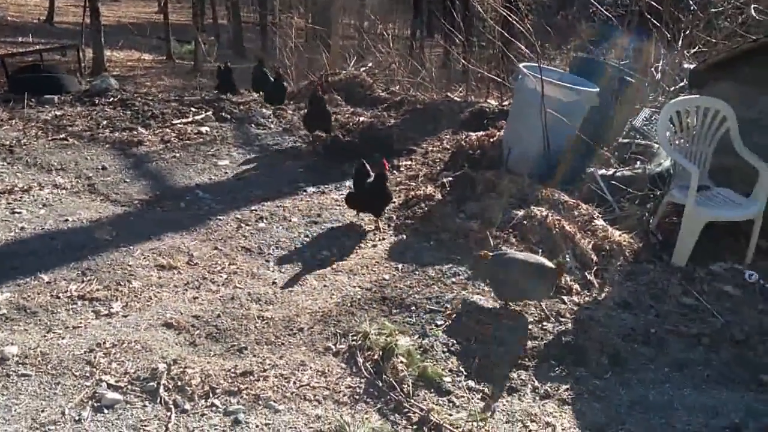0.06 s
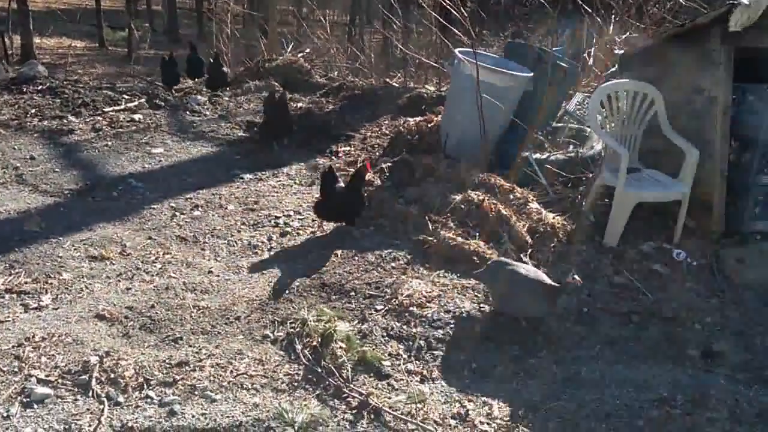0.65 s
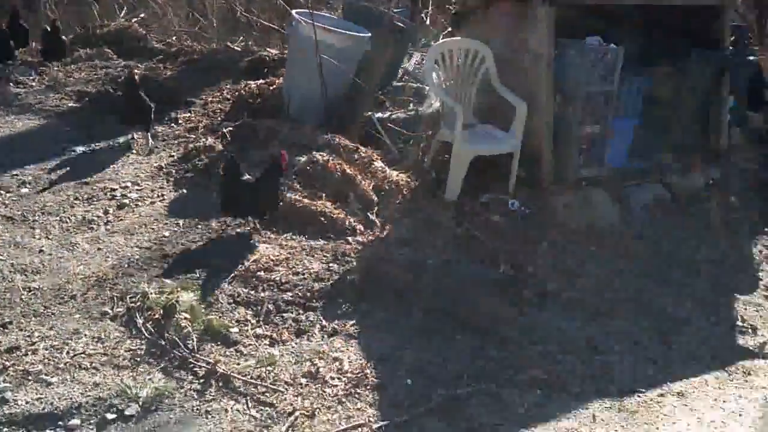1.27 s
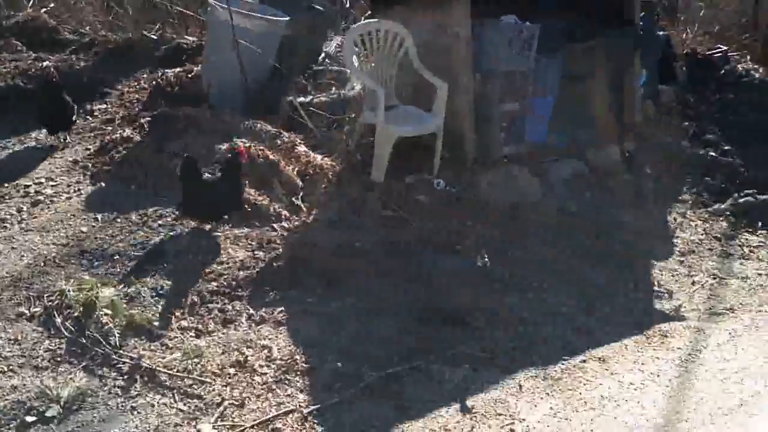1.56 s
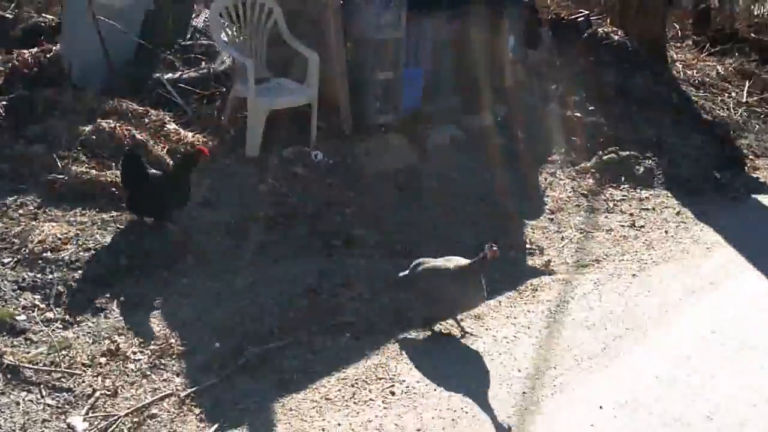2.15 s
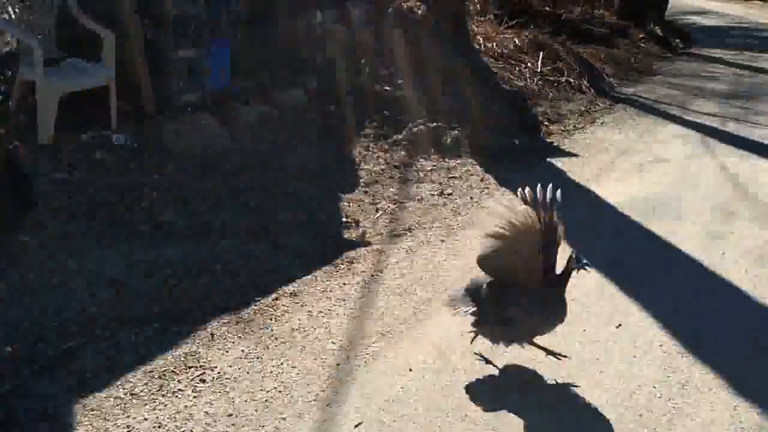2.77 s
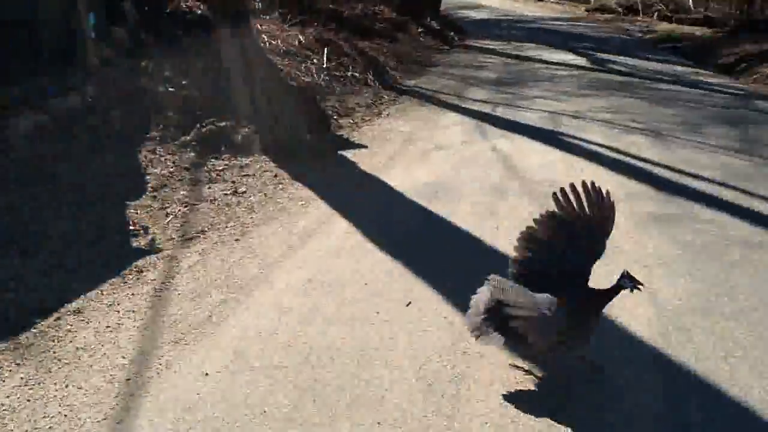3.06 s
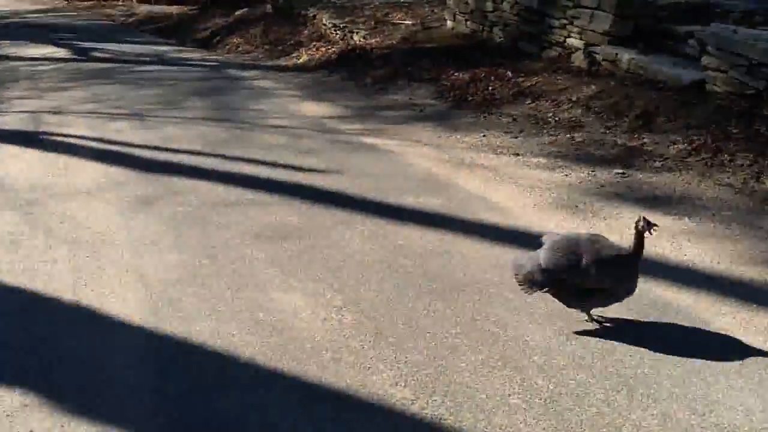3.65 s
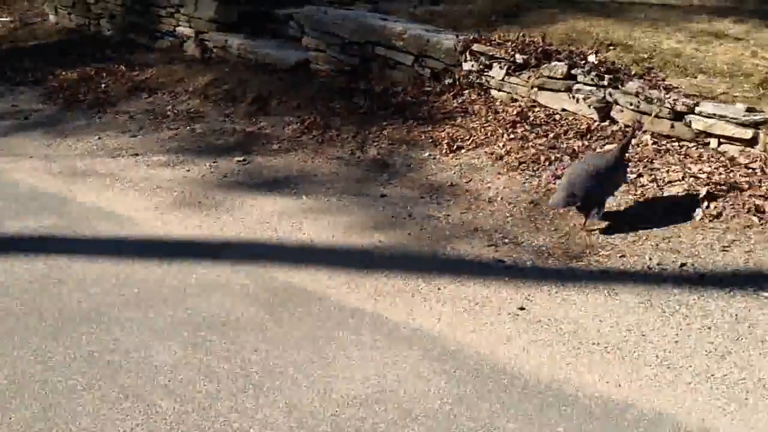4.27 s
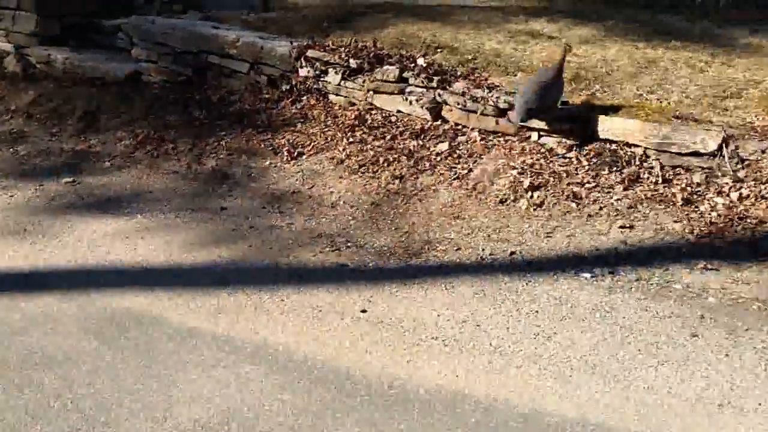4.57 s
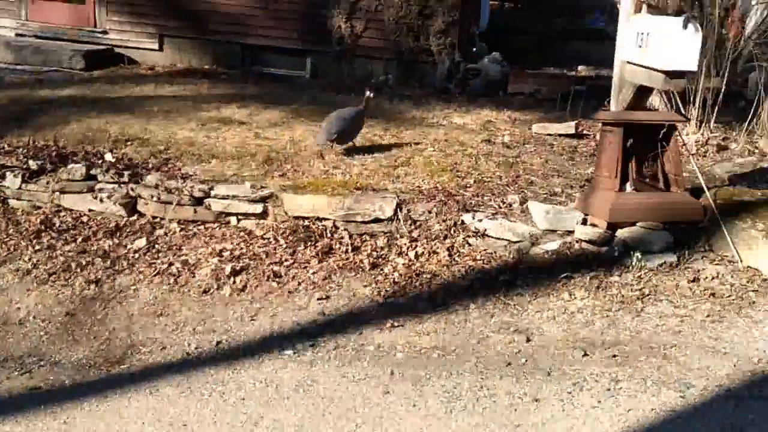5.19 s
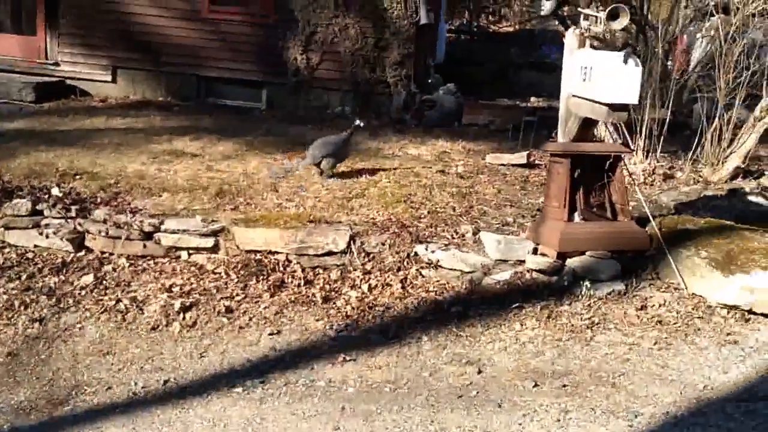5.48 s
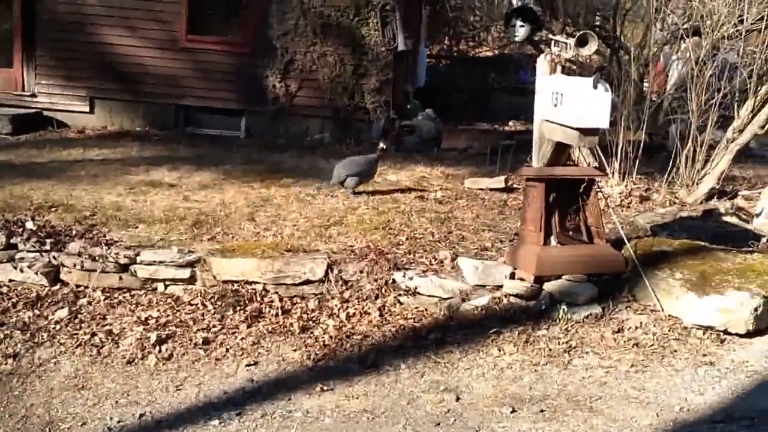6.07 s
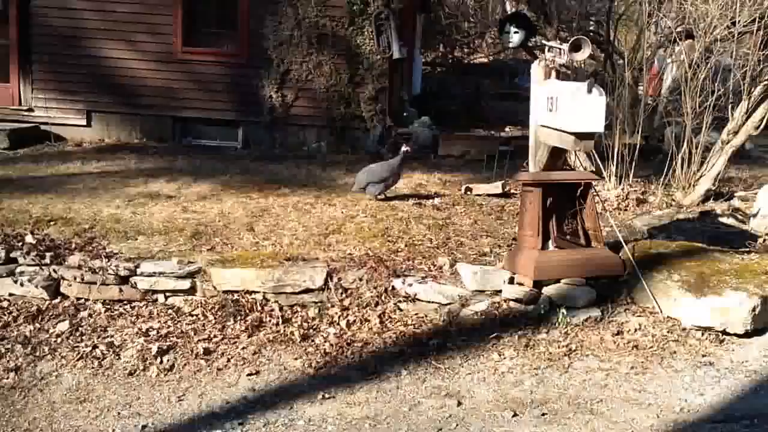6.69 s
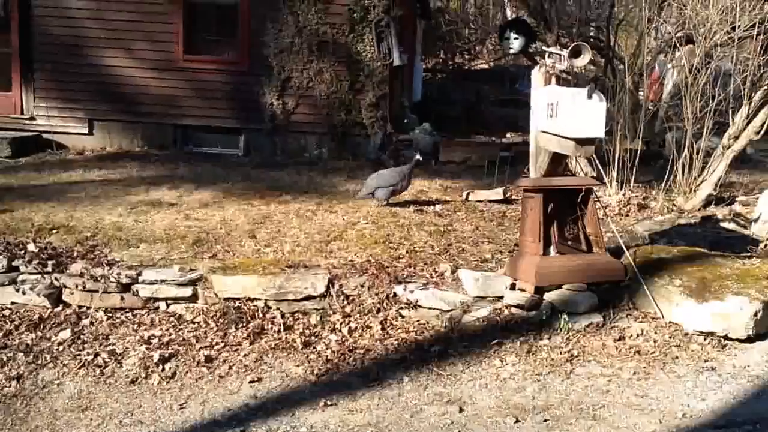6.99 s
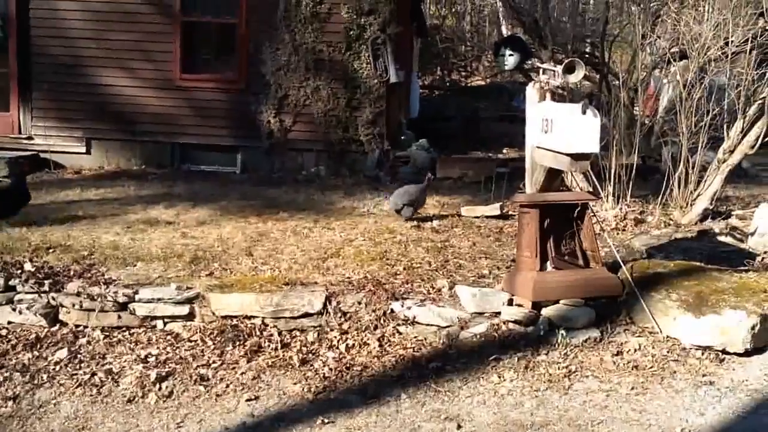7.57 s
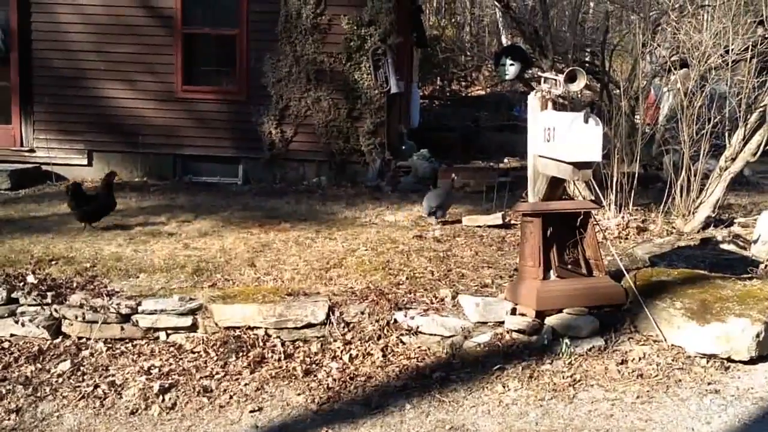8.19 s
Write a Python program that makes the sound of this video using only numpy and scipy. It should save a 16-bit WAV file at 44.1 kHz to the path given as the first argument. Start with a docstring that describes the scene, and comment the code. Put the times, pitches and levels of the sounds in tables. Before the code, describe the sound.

Loud, raspy, rattling guinea fowl calls repeat quickly, then grow fainter while leaves rustle and hens cluck faintly in the distance.

```python
"""Guinea fowl on the run

A guinea fowl runs squawking from a leafy yard over a road onto a lawn. Each squawk is a rough buzz
near 300 Hz, chopped into a rattle and sharpened by a throat resonance near 3.5 kHz; the ground
reflects it about a millisecond later. Leaves and grit rustle, soft steps thud, hens cluck farther off.
The nearest squawks overload the microphone, whose stereo image is very wide."""
import sys
import numpy as np
from scipy import signal
from scipy.fft import rfft, irfft, next_fast_len
from scipy.io import wavfile
from scipy.ndimage import map_coordinates

SR = 44100
rng = np.random.default_rng(int(sys.argv[2]) if len(sys.argv) > 2 else 0)


def master_out(mix):
    """Clip the mix to full scale and print it as 16-bit PCM to the path in sys.argv[1]."""
    frames = np.transpose(np.atleast_2d(mix))
    ceiling = np.clip(frames, -1, 1)
    pcm = np.round(ceiling * 32767).astype(np.int16)
    wavfile.write(sys.argv[1], SR, pcm)


N = 367794

# short calls: start_s, length_s, effort_db, soft_start_db, fade_db, first_rattle_hz, last_rattle_hz,
# pitch_hz, throat_hz, chest_db, rasp_db, squeak_db
SQUAWKS = [(0.022, 0.064, -12.5, 8.5, 11, 60.7, 49.1, 315.2, 3640, -9.5, -4.5, -31),
           (0.274, 0.13, -17, 3, 6, 99.6, 37.3, 324, 3490.0, -8.5, -5, -16.0),
           (0.592, 0.14, -20.6, 7, 5.5, 92.5, 35, 317.3, 3410, -8.5, -10, -24),
           (0.822, 0.2, -17, 8.5, 6, 58.6, 48.3, 308.9, 3294, -9.5, -5.5, -25.4),
           (1.166, 0.12, -16, 1, 12.5, 103.8, 29, 316, 3230, -11.5, -5.8, -30),
           (1.429, 0.12, -12, 6.6, 7.0, 63, 39.4, 323.2, 3470, -10, -2.5, -29),
           (1.698, 0.097, -14.5, 5.5, 8, 89, 35, 310.6, 3230, -9.0, -4.5, -23),
           (1.983, 0.059, -14.5, -2, 7.5, 56, 33.4, 295.6, 3280, -10, -5, -21.5),
           (2.187, 0.054, -20, -7, 0, 51.5, 39, 297.5, 3320, -9.5, -6.3, -7),
           (2.359, 0.057, -16.5, -0.5, 7, 63, 20, 295.1, 3460, -9.5, -3, -7),
           (2.532, 0.087, -13, 14, 17, 60.3, 43, 300.0, 3390, -11.5, -4.5, -25),
           (2.712, 0.067, -15.5, 0.2, 3.5, 66.4, 60.7, 325.9, 3810, -11, -11, -17),
           (2.892, 0.066, -14, 6.7, 7, 74.6, 53.7, 323.3, 3560, -8, -7, -24.4),
           (3.045, 0.045, -11, 18.5, 10.5, 80, 25.0, 315, 3410, -15, -5, -26.2),
           (3.201, 0.054, -15.5, 6, 3.5, 35.7, 95, 320.5, 3520, -10.5, -7.5, 2.5),
           (3.408, 0.11, -18, 9.5, 8, 102.7, 40.0, 311.2, 3760, -7.5, -5.5, -12.5),
           (3.604, 0.17, -19.5, 4, 12, 86.6, 69, 315, 3970, -7.5, -3, -31),
           (4.533, 0.047, -18.5, 2, 8, 60, 80.4, 328.8, 3560, -14, -4.5, -23),
           (4.651, 0.056, -20.5, -3, 1.5, 96.3, 73, 338.6, 3520, -10, -4.5, -11),
           (4.808, 0.042, -21.5, 22, 0, 73, 27, 342.4, 3500, -14, -8, -24),
           (4.944, 0.048, -19.5, 22, 10.5, 67.6, 22.4, 316.1, 3620, -13.5, -9.5, -18),
           (5.089, 0.047, -24, 3.5, 4.5, 61.5, 88, 298.3, 3650, -4, -4, -32),
           (5.768, 0.066, -19, 4.5, 12, 70, 41.2, 308.0, 3446, -14.5, -7, -11),
           (6.022, 0.15, -21.8, 11.5, 11, 62, 40.5, 302.0, 3450, -14.5, -8.5, -14),
           (6.384, 0.12, -25.5, 3.5, 3.5, 123.8, 31, 305.6, 3260, -7.5, -6.3, -25),
           (6.673, 0.13, -21, 3, 10, 75, 37, 313, 3370, -14, -8.5, -23.5),
           (6.948, 0.14, -23, 4.5, 9.5, 67, 35, 308, 3350, -10.5, -7.5, -12),
           (7.187, 0.17, -25, -2.5, 8.5, 67, 43, 318.6, 3250, -11, -8.5, -3.5),
           (7.489, 0.13, -25.5, 3.5, 11.5, 91, 33.2, 309.8, 3570, -9.5, -11, -13),
           (7.782, 0.11, -29, -0.5, -1, 125.0, 26.8, 306.0, 3650, -8, -11.5, -14),
           (8.108, 0.13, -23, 11.5, 6.5, 68, 41, 313.8, 3460, -15, -9, -12)]
# effort through two drawn-out cries: time_s, effort_db, rattle_hz
SCREECH = [(3.872, -23, 78), (3.895, -17.5, 69), (3.929, -20, 60), (3.986, -32, 64.6), (4.043, -24.5, 66),
           (4.1, -27.5, 68.5), (4.157, -25, 84), (4.214, -33.5, 61.5), (4.271, -31, 83), (4.328, -25, 59),
           (4.385, -28, 87.8)]
CHATTER = [(5.293, -22.5, 69.85), (5.354, -25.5, 49.12), (5.416, -30.5, 45), (5.477, -30, 50.13),
           (5.538, -22, 62.9), (5.6, -25, 49.25), (5.661, -36, 41.4)]
# drawn-out cries: effort_curve, top_pitch_hz, throat_hz, chest_db, rasp_db
CRIES = [(SCREECH, 326, 3750, -9.5, 1), (CHATTER, 310, 3240, -10, -7)]
# spectra of the low harmonics, the fixed part of the throat and the rasp: frequency_hz, gain_db
CHEST = [(350, -45), (480, -24), (620, -15), (780, -10), (920, 0), (1060, -6), (1220, -1), (1520, -1),
         (1850, -3), (2100, -9), (2500, -30), (3200, -60)]
WINDPIPE = [(1200, -33.5), (1900, 1), (2250, 3.5), (2530, 6), (3100, -4.5), (3600, -19), (4300, -8),
            (4800, -11), (6000, -49.5)]
RASP = [(2500, -19.5), (4000, 7.5), (4900, -1), (5600, -2.5), (6400, 0), (7200, -8), (8200, -13.5),
        (9400, -21), (11500, -26), (13000, -56.5), (15000, -62)]
# the fundamental, carried by hard ground and absorbed by leaves and turf: time_s, gain_db
FUNDAMENTAL = [(0, -23), (2.5, -25.5), (3.7, -19), (4.3, -24.5), (4.7, -28), (8.3, -31.5)]
# reflection from the ground under the bird: time_s, delay_ms, strength_ratio
GROUND_BOUNCE = [(0.05, 1.26, 0.4), (0.66, 1.027, 0.53), (0.92, 0.94, 0.5), (1.65, 0.82, 0.44),
                 (2.55, 1.19, 0.14), (2.92, 0.972, 0.7), (3.5, 0.974, 0.68), (3.999, 0.78, 0.34),
                 (4.4, 0.806, 0.14), (4.53, 1.144, 0.42), (5.8, 0.99, 0.1), (7.2, 0.6, 0.21),
                 (8.2, 0.5, 0.27)]
# wings and feet stirring leaves and grit: start_s, length_s, level_db, tilt_db_per_octave
RUSTLES = [(2.45, 0.15, -56.5, 8), (2.628, 0.098, -51.5, 6.5), (2.761, 0.15, -45, 3),
           (2.954, 0.1, -44.5, 6), (3.087, 0.12, -41, 5.5), (3.258, 0.066, -44, 4), (3.5, 0.075, -33, 2),
           (4.15, 0.32, -36.5, 6.5), (4.419, 0.14, -46, 11), (4.577, 0.25, -41.5, 3.5),
           (5.001, 0.059, -45, 3), (5.885, 0.16, -56.5, 8.5), (6.222, 0.13, -65, 9),
           (7.397, 0.043, -59.5, 11), (7.697, 0.043, -50.5, 15.5), (8.013, 0.043, -52, 11.5)]
# spectrum of dry leaves: frequency_hz, gain_db
LEAVES = [(100, -14), (400, 7), (1000, 7.5), (3000, -0.5), (7000, -8), (10000, -20.5), (15000, -45)]
# twigs and pebbles snapping: start_s, level_db
SNAPS = [(3.53, -33), (3.544, -31), (3.559, -46), (4.483, -27), (4.632, -71), (5.263, -47)]
# hens' notes: start_s, length_s, pitch_hz, level_db
CLUCKS = [(6.134, 0.042, 907, -46), (6.801, 0.041, 811, -47.5), (7.33, 0.05, 767, -54),
          (7.628, 0.036, 821, -55), (7.966, 0.042, 770, -63), (8.147, 0.047, 928, -50)]
# footfalls close to the microphone: start_s, level_db
STEPS = [(6.489, -48), (7.539, -44.5), (7.595, -53), (8.165, -40), (8.246, -42)]
# echo from trees and walls, stronger as the bird gets away: time_s, gain_db
ECHO_SEND = [(0, -18.5), (3.199, -14.5), (4.498, -9), (5.5, -13), (8.3, -12)]
# reverberation time of the yard: frequency_hz, t60_s
YARD_DECAY = [(200, 0.22), (1000, 0.18), (3000, 0.22), (7000, 0.28), (14000, 0.31)]
# initial spectrum of the reverberation: frequency_hz, gain_db
YARD_TONE = [(200, 9.5), (1000, 4), (3000, -2.5), (7000, -4), (14000, 2.5)]
# microphone thumps under the hardest beats: start_s, level_db
THUMPS = [(0.057, -29.5), (0.301, -28.5), (.925, -32), (1.185, -26.5), (1.447, -25), (1.716, -25.5),
          (2.005, -32.5), (2.572, -29), (2.732, -22.5), (2.918, -26.5), (3.221, -28.5), (3.634, -23.5),
          (3.901, -31.5)]
# phase difference of the stereo pair: frequency_hz, left_lead_rad
PAIR_PHASE = [(80, -2.5), (400, -1.57), (850, 0.06), (1600, 0.22), (1950, 3.5), (2400, 3.5), (2780, 6),
              (3400, 7), (3900, 8), (4500, 10), (4900, 5.5), (5500, 8), (5900, 8), (6600, 9.5),
              (7300, 12.5), (8100, 14.5), (8500, 14), (9300, 20.5)]
# level difference of the stereo pair: frequency_hz, left_minus_right_db
PAIR_BALANCE = [(150, 3), (330, 3), (600, 1.5), (1200, 0), (1850, -6.5), (2100, -2), (2550, 11.5),
                (3100, 0.5), (3650, -2.5), (4300, 4.5), (5000, -0.5), (6800, 5.5), (9000, 3), (14000, 2)]
# spectra of the open air, in phase and in antiphase at the two ears: frequency_hz, gain_db
AIR_MID = [(30, -5), (80, 1.5), (170, -5), (355, -12.5), (1600, -23), (3100, -17), (4300, -28.5),
           (7500, -21.5), (14000, -39)]
AIR_SIDE = [(30, -7), (80, -0.5), (190, -10), (340, -31.5), (700, -40), (8000, -32.5), (14000, -50)]


def guinea_fowl(throat_width_hz=600, throat_wobble=.077, squeak_hz=1471, squeak_width_hz=55):
    """Source and filter: one buzz is clean in the chest, rough in the throat and mostly air in the rasp."""
    calls = [squawk(*row) for row in SQUAWKS] + [cry(*row) for row in CRIES]
    calls.sort(key=lambda call: call[0][0])
    call_s, _, _, *controls = np.hstack(calls)
    t = np.arange(N) / SR
    pitch_hz, throat_hz, chest_db, rasp_db, squeak = (np.interp(t, call_s, c) for c in controls)
    slaps, puffs, swing = syrinx(pitch_hz)
    chest = coloured(windpipe_dispersion(slaps) + .28 * puffs, CHEST)
    rough = slaps + .75 * puffs
    throat_hz = throat_hz * (1 + throat_wobble * wander(70))  # the throat shakes from beat to beat
    ring = evened(resonate(resonate(rough, throat_hz, throat_width_hz), throat_hz, throat_width_hz))
    throat = evened(ring + gain_of(-1 + 2 * wander(40)) * coloured(rough, WINDPIPE))
    rasp = coloured(slaps + 1.8 * puffs, RASP)
    chest_gain = gain_of(chest_db - 2.5)
    rasp_gain = gain_of(rasp_db + 4 + 2 * wander(40))
    voice = throat + chest_gain * chest + rasp_gain * rasp
    voice /= np.sqrt(1 + chest_gain ** 2 + rasp_gain ** 2)
    voice += swing * gain_of(np.interp(t, *np.transpose(FUNDAMENTAL)))
    nasal = evened(filtered(rough, lambda hz: np.exp(-((hz - squeak_hz) / squeak_width_hz) ** 2)))
    voice += gain_of(1) * squeak * nasal
    airflow = np.zeros(N)
    for time_s, effort_db, rattle_hz, *_ in calls:
        add(airflow, time_s[0], rattle(time_s, effort_db, rattle_hz))
    return voice * airflow * gain_of(1.78 * wander(40))


def squawk(start_s, length_s, effort_db, soft_start_db, fade_db, first_rattle_hz, last_rattle_hz,
           pitch_hz, throat_hz, chest_db, rasp_db, squeak_db, swell_s=.015, glide_s=.04, squeak_s=.021):
    """Modulation of a short call: pitch and throat arch over while the rattle glides, usually slowing."""
    t = np.arange(0, length_s, 1 / SR)
    opening, progress = np.exp(-t / swell_s), t / length_s
    slack_db = soft_start_db * opening + fade_db * progress ** 3
    rattle_hz = last_rattle_hz + (first_rattle_hz - last_rattle_hz) * np.exp(-t / glide_s)
    pitch = pitch_hz * (1 - .02 * opening - .085 * progress ** 2)
    throat = throat_hz * (1 - .02 * opening - .09 * progress ** 2)
    beak_db = 2 * (.5 - progress)  # the rasp dulls as the beak closes
    colour = voice_colour(chest_db, rasp_db + beak_db, slack_db)
    squeak = gain_of(squeak_db) * np.exp(-(t / squeak_s) ** 2)
    return start_s + t, effort_db - slack_db, rattle_hz, pitch, throat, *colour, squeak


def cry(effort_curve, top_pitch_hz, throat_hz, chest_db, rasp_db, sag_per_db=.004):
    """Modulation of a long call: pitch and throat resonance sag whenever the effort slackens."""
    time_s, curve_db, curve_hz = np.transpose(effort_curve)
    t = np.arange(time_s[0], time_s[-1], 1 / SR)
    effort_db, rattle_hz = np.interp(t, time_s, curve_db), np.interp(t, time_s, curve_hz)
    slack_db = curve_db.max() - effort_db
    sag = 1 - sag_per_db * slack_db
    colour = voice_colour(chest_db, rasp_db, slack_db)
    return t, effort_db, rattle_hz, top_pitch_hz * sag, throat_hz * sag, *colour, np.zeros(len(t))


def voice_colour(chest_db, rasp_db, slack_db):
    """Spectral tilt follows effort: a slacker voice has more low harmonics and less rasp."""
    return chest_db + .91 * slack_db, rasp_db - .57 * slack_db


def syrinx(pitch_hz):
    """Membrane oscillation gives uneven slaps, puffs of air between them and a sinusoidal swing."""
    cycles = np.cumsum(pitch_hz * (1 + .03 * wander(220) + .014 * wander(35))) / SR
    samples_from_slap = (cycles % 1 - .5) * SR / pitch_hz
    slaps = np.sinc(samples_from_slap) * np.exp(-(samples_from_slap / 8) ** 2)
    puffs = (.59 + np.exp(-((cycles + .5) % 1) / 1.9)) * rng.standard_normal(N)
    return evened(slaps - slaps.mean()), evened(puffs), evened(np.cos(2 * np.pi * cycles))


def windpipe_dispersion(x, delay_s_per_hz=2.2e-6):
    """Dispersion: the long windpipe delays higher harmonics more, so each slap rings through its cycle."""
    return filtered(x, lambda hz: np.exp(-1j * np.pi * delay_s_per_hz * (hz - 900) ** 2))


def rattle(t, effort_db, rattle_hz, peak_s=.0061, half_width_s=.006, leak=.27, edge_s=.0027):
    """Amplitude modulation: airflow beats of fixed length merge when fast and part when slow."""
    age_s = (np.cumsum(rattle_hz) / SR % 1) / rattle_hz
    beats = leak + np.exp(-((age_s - peak_s) / half_width_s) ** 4)
    ends = np.clip(np.minimum(t - t[0], t[-1] - t) / edge_s, 0, 1)
    return gain_of(effort_db) * beats * ends


def ground_reflection(x):
    """Interference with the bounce combs the voice; the comb shifts with range, deepest on asphalt."""
    time_s, delay_ms, strength = np.transpose(GROUND_BOUNCE)
    n = np.arange(N)
    delay_samples = np.interp(n / SR, time_s, delay_ms) * SR / 1000
    strength = np.interp(n / SR, time_s, strength)
    bounce = map_coordinates(x, [n - delay_samples], order=3)
    return (x + strength * bounce) / np.sqrt(1 + strength ** 2)


def leaf_litter(grains_per_s=1800, spread_db=4, snap_decay_s=.0027):
    """Shot noise: tiny impacts of leaves and grit sum to swells of crackle, with an occasional snap."""
    sizes = gain_of(spread_db * np.minimum(rng.exponential(1, N), 4))
    grains = sizes * rng.standard_normal(N) * (rng.random(N) < grains_per_s / SR)
    hiss = coloured(rng.standard_normal(N), LEAVES)
    crackle = coloured(grains, LEAVES) + .5 * hiss
    out = np.zeros(N)
    for start_s, length_s, level_db, tilt_db in RUSTLES:
        rustle = crackle[round(start_s * SR):][:round(length_s * SR)]
        rustle = filtered(rustle, lambda hz: gain_of(tilt_db * np.log2(1 + hz / 600)))
        add(out, start_s, gain_of(level_db) * evened(rustle) * signal.windows.tukey(len(rustle), .7))
    t = np.arange(SR // 50) / SR
    for start_s, level_db in SNAPS:
        snap = hiss[round(start_s * SR):][:len(t)] * np.exp(-t / snap_decay_s)
        add(out, start_s, gain_of(level_db) * snap)
    return out


def hens(fall=.24, jitter=.077, overtone_db=-14):
    """Frequency jitter makes each short, falling note hoarse."""
    out, waver = np.zeros(N), wander(330)
    for start_s, length_s, pitch_hz, level_db in CLUCKS:
        progress = np.linspace(0, 1, round(length_s * SR))
        bend = 1 - fall * (progress - .5) + jitter * waver[round(start_s * SR):][:len(progress)]
        phase = 2 * np.pi * np.cumsum(pitch_hz * bend) / SR
        tone = np.sin(phase) + gain_of(overtone_db) * np.sin(2 * phase)
        add(out, start_s, gain_of(level_db) * evened(tone * np.sin(np.pi * progress)))
    return out


def footfalls():
    """Damped impacts of soles on packed earth give dull thuds."""
    return thuds(STEPS, length_s=1 / 6, rise_s=.0023, decay_s=.028, cutoff_hz=330)


def yard_echo(x, near_db=-17, near_decay_s=.0048, echoes_per_s=2500):
    """Scattering from things close by, then a short tail from trunks and walls, in two random versions."""
    size = SR * 3 // 4
    t = np.arange(size) / SR
    signs = rng.choice([-1., 1.], (2, 2, size))
    far_taps, near_taps = signs * (rng.random((2, 2, size)) < echoes_per_s / SR)
    hz, frame_s, spectra = signal.stft(far_taps * np.clip(t / .015, 0, 1), SR, nperseg=256)
    fade_db = read(YARD_TONE, hz)[:, None] - 60 * frame_s / read(YARD_DECAY, hz)[:, None]
    tail = signal.istft(spectra * gain_of(fade_db), SR, nperseg=256)[1][:, :size]
    scatter = near_taps * (t > .002) * np.exp(-t / near_decay_s)
    send = gain_of(np.interp(np.arange(N) / SR, *np.transpose(ECHO_SEND)))
    far = signal.fftconvolve((x * send)[None], tail / np.linalg.norm(tail[0]), axes=1)
    near = signal.fftconvolve(x[None], scatter / np.linalg.norm(scatter[0]), axes=1)
    return (far + gain_of(near_db) * near)[:, :N]


def overload(x, knee_db=-13, squash_db=-10):
    """Asymmetric distortion squashes loud peaks on one side; low thumps are added at listed times."""
    excess = np.maximum(x - gain_of(knee_db), 0)
    thumps = thuds(THUMPS, length_s=1 / 12, rise_s=.001, decay_s=.02, cutoff_hz=230)
    return x - gain_of(squash_db) * lowpass(excess, cutoff_hz=220) + thumps


def stereo_pair(x):
    """Phase and level differences that vary with frequency widen the image at constant total power."""
    sides = np.array([[.5], [-.5]])

    def response(hz):
        balance = gain_of(sides * read(PAIR_BALANCE, hz))
        balance /= np.sqrt(np.mean(balance ** 2, 0))
        return balance * np.exp(1j * sides * read(PAIR_PHASE, hz))
    return filtered(x, response)


def open_air(mid_db=-65, side_db=-62, swell_db=4):
    """Ambient noise: a faint, slowly swelling hush, only partly coherent between the ears."""
    mid = gain_of(mid_db) * coloured(rng.standard_normal(N), AIR_MID)
    side = gain_of(side_db) * coloured(rng.standard_normal(N), AIR_SIDE)
    return np.array([mid + side, mid - side]) * gain_of(swell_db * wander(3.6))


def thuds(events, length_s, rise_s, decay_s, cutoff_hz):
    """Bursts of low-passed noise rise quickly and decay exponentially."""
    out, t = np.zeros(N), np.arange(round(length_s * SR)) / SR
    envelope = np.exp(-t / decay_s) * np.minimum(t / rise_s, 1)
    for start_s, level_db in events:
        noise = evened(lowpass(rng.standard_normal(len(t)), cutoff_hz))
        add(out, start_s, gain_of(level_db) * noise * envelope)
    return out


def resonate(x, centre_hz, width_hz):
    """A damped resonance with a moving centre frequency."""
    carrier = np.exp(2j * np.pi * np.cumsum(centre_hz) / SR)
    pole = np.exp(-np.pi * width_hz / SR)
    return 2 * (carrier * signal.lfilter([1 - pole], [1, -pole], x / carrier)).real


def filtered(x, response):
    """Linear filtering by a frequency response, given as a function of Hz."""
    size = next_fast_len(x.shape[-1] + 2048, real=True)
    return irfft(rfft(x, size) * response(np.fft.rfftfreq(size, 1 / SR)), size)[..., :x.shape[-1]]


def lowpass(x, cutoff_hz):
    """Zero-phase roll-off of 12 dB per octave."""
    return filtered(x, lambda hz: 1 / (1 + (hz / cutoff_hz) ** 2))


def coloured(x, spectrum):
    """Spectral shaping, scaled to rms 1."""
    return evened(filtered(x, lambda hz: gain_of(read(spectrum, hz))))


def wander(rate_hz):
    """Smooth random fluctuation of rms 1 and bandwidth about rate_hz."""
    return evened(filtered(rng.standard_normal(N), lambda hz: np.exp(-(hz / rate_hz) ** 2)))


def read(points, hz):
    """Interpolation on a log-frequency axis."""
    frequency_hz, value = np.transpose(points)
    return np.interp(np.log(hz + 1), np.log(frequency_hz + 1), value)


def gain_of(db):
    """Decibels to amplitude ratio."""
    return 10 ** (np.asarray(db) / 20)


def evened(x):
    """Normalisation to rms 1."""
    return x / np.sqrt(np.mean(x ** 2) + 1e-20)


def add(mix, start_s, sound):
    """Superposition of a sound on the mix from start_s."""
    part = mix[..., max(round(start_s * SR), 0):][..., :sound.shape[-1]]
    part += sound[..., :part.shape[-1]]


def scene():
    """Direct sound, echoes and air superpose; part of the treble echo reaches the ears in antiphase."""
    direct = ground_reflection(guinea_fowl()) + leaf_litter() + hens() + footfalls()
    echo_mid, echo_side = yard_echo(direct)
    echo_side = filtered(echo_side, lambda hz: 1.5 * hz / np.hypot(hz, 7000)) * np.array([[1], [-1]])
    return stereo_pair(overload(direct) + echo_mid + echo_side) + open_air()


def record(dry, low_cut_hz=72, ceiling=.85, high_cut_hz=14700):
    """Limited bandwidth and headroom: the bass rolls off, peaks clip and the top treble is cut."""
    thinned = signal.sosfilt(signal.butter(2, low_cut_hz, "high", fs=SR, output="sos"), dry)
    clipped = np.clip(thinned, -ceiling, ceiling)
    band_limit = signal.firwin(255, high_cut_hz, window=("kaiser", 9), fs=SR)
    return signal.oaconvolve(clipped, band_limit[None], "same")


dry = scene()
out = record(dry)
master_out(out)
```